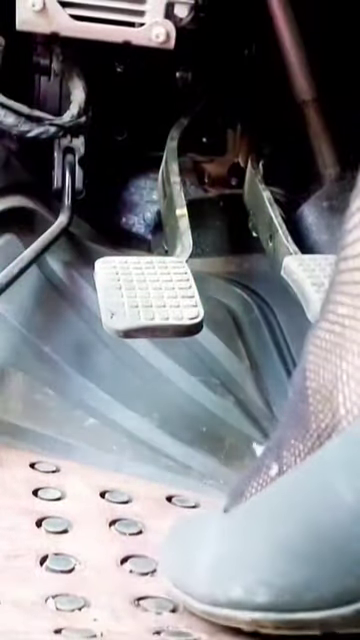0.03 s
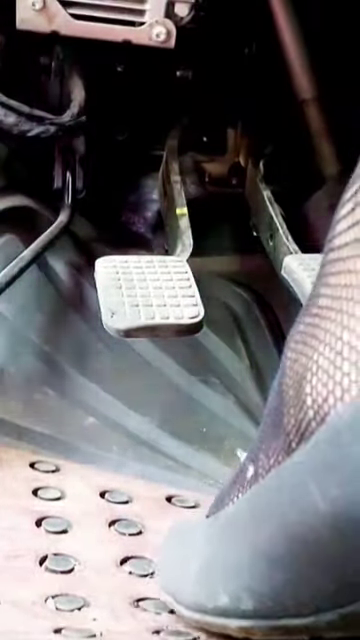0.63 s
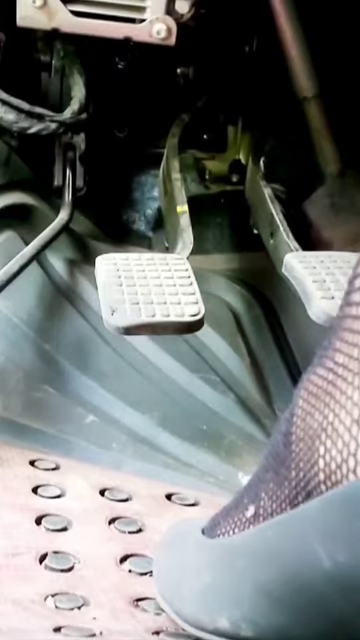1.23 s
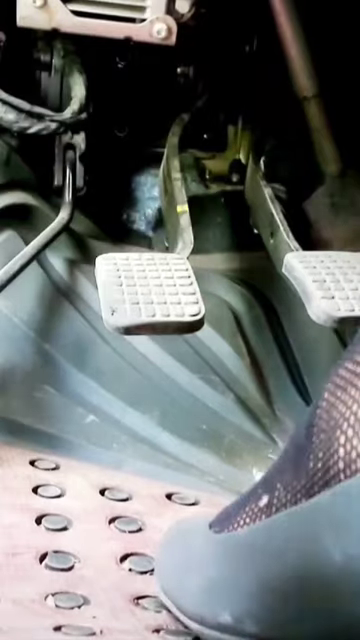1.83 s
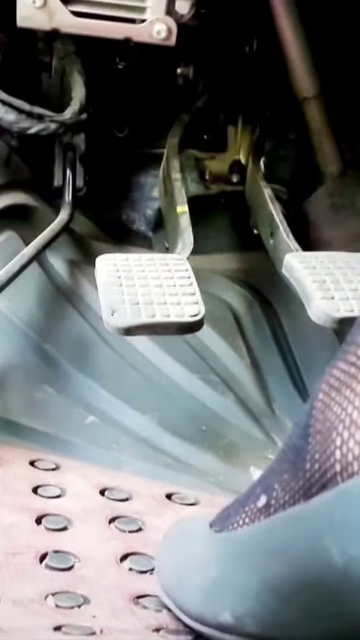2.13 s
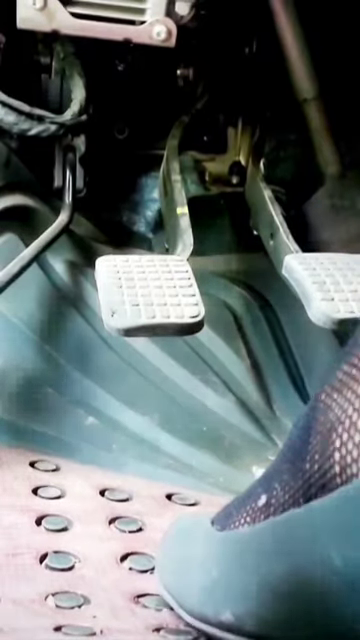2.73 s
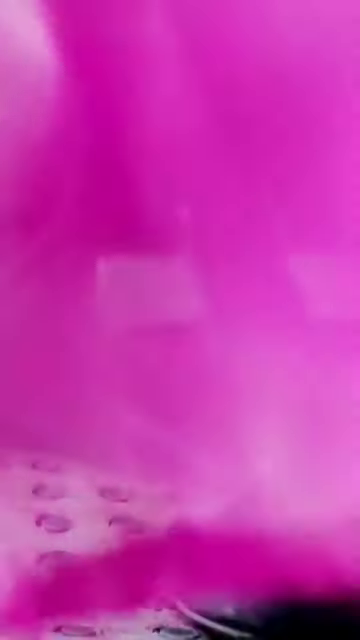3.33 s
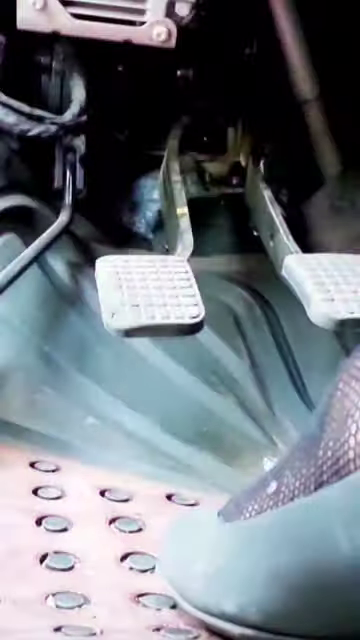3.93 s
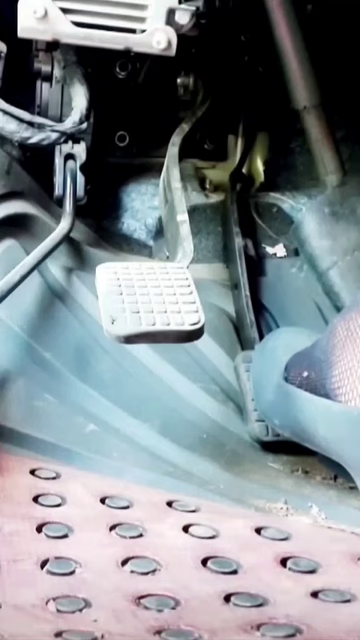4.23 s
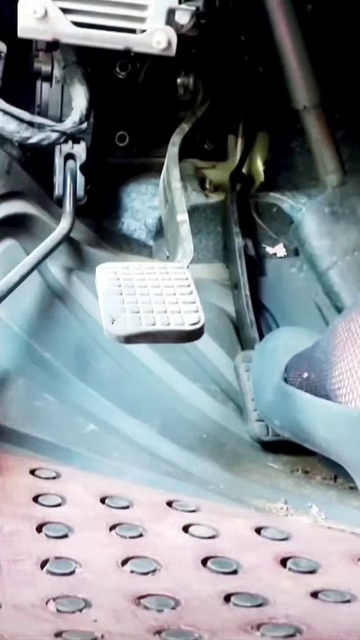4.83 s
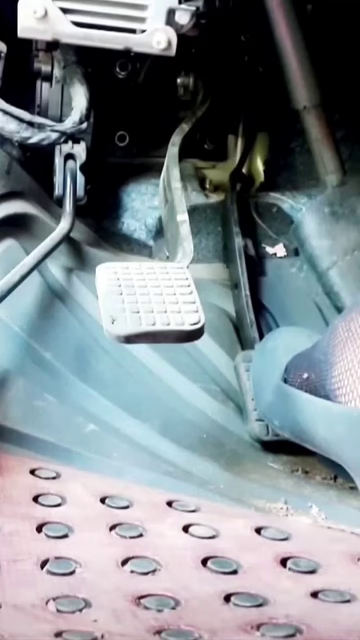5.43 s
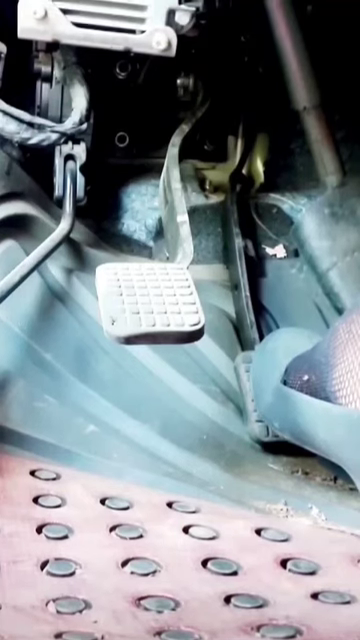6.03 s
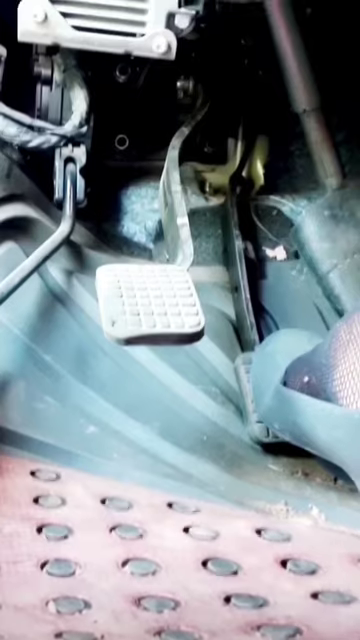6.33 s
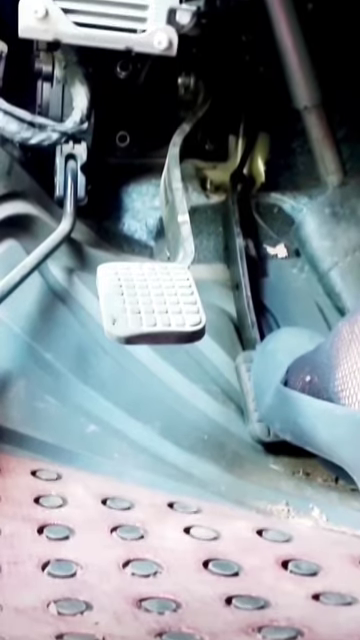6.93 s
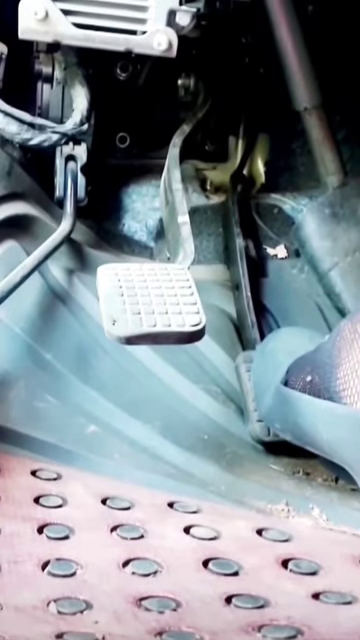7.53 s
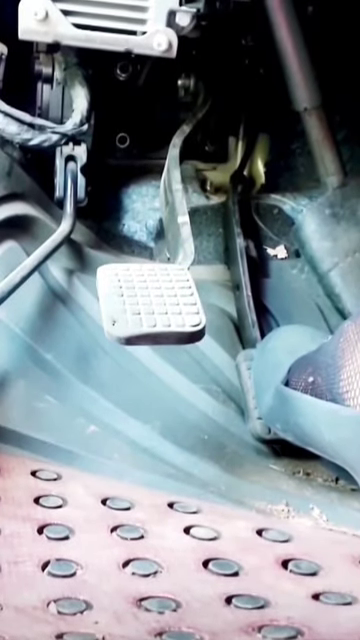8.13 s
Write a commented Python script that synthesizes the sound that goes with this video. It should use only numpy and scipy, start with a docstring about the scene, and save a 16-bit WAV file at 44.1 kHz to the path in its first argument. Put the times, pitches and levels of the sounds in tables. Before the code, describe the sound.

A shoe scuffs and thumps around the pedals inside a small car, with a short squeak and a few sharp clicks close to the microphone. After more clicks from the key and a soft electric whir, the starter cranks three times and the engine fires, thumping through the cabin before dropping to idle as the starter whines down. Very faint insects chirp outside.

```python
"""A small car starts, heard from the footwell: the starter's gears grind through three compression
strokes, the engine catches, and its firings thump the cabin and sink to a low idle as the freed
starter whines down. Beforehand a shoe shuffles and squeaks on the mat and knocks on the floor pan.
Pedals and key click, and an electric part whirs briefly. Insects chirp faintly outside."""
import sys
import numpy as np
from scipy import signal
from scipy.fft import rfft, irfft, next_fast_len
from scipy.io import wavfile

SR = 44100
rng = np.random.default_rng(int(sys.argv[2]) if len(sys.argv) > 2 else 0)


def pcm_store(signal):
    """Save signal as 16-bit PCM."""
    levels = np.round(np.clip(np.atleast_2d(signal), -1, 1) * 32767)
    wavfile.write(sys.argv[1], SR, levels.astype(np.int16).T)


N = 360738
TIME = np.arange(N) / SR

# Spectrum of the shaking floor. Each row: frequency in Hz, density in dB.
RUMBLE = [(28, -10), (45, 0), (80, 4), (100, 3.5), (140, -12)]


def from_db(db):
    return 10 ** (np.asarray(db) / 20)


def unit_rms(x):
    return x / np.sqrt(np.mean(x ** 2) + 1e-20)


def curves(rows):
    """Rows of (time in s, values ..) interpolated to one signal per value column."""
    times_s, *columns = np.transpose(rows)
    return [np.interp(TIME, times_s, column) for column in columns]


def gate(start_s, end_s, fade_s=0.01):
    """1 from start to end, with linear fades outside."""
    return np.clip((TIME - start_s) / fade_s + 1, 0, 1) * np.clip((end_s - TIME) / fade_s + 1, 0, 1)


def during(rows):
    return gate(rows[0][0], rows[-1][0])


def white():
    return rng.standard_normal(N)


def drift(rate_hz):
    """Straight lines between standard normal values, rate_hz of them a second."""
    knots = rng.standard_normal(20000)
    return np.interp(TIME * rate_hz, np.arange(len(knots)), knots)


def coloured(x, spectrum):
    """x shaped by (Hz, dB) points, falling 24 dB per octave beyond the ends; rms 1."""
    size = next_fast_len(N)
    octave = np.log2(np.maximum(np.arange(size // 2 + 1) * SR / size, 1))
    hz, db = np.transpose(spectrum)
    beyond = np.abs(octave - np.clip(octave, np.log2(hz[0]), np.log2(hz[-1])))
    gain = from_db(np.interp(octave, np.log2(hz), db) - 24 * beyond)
    return unit_rms(irfft(rfft(x, size) * gain, size)[:N])


def resonate(x, modes):
    """x through parallel resonances (Hz, width in Hz, dB) of alternating sign; rms 1."""
    out = 0
    for k, (hz, width_hz, db) in enumerate(modes):
        r = np.exp(-np.pi * width_hz / SR)
        band = signal.lfilter([1, 0, -1], [1, -2 * r * np.cos(2 * np.pi * hz / SR), r * r], x + 1e-18)
        out = out + (-1) ** k * from_db(db) * unit_rms(band)
    return unit_rms(out)


def ring(blows, hz, t60_s):
    """One mode: a unit blow starts a decaying sine of height 1."""
    r, w = from_db(-60 / (t60_s * SR)), 2 * np.pi * hz / SR
    return signal.lfilter([0, np.sin(w)], [1, -2 * r * np.cos(w), r * r], blows + 1e-18)


def lowpass(x, hz):
    return signal.sosfilt(signal.butter(2, hz, fs=SR, output="sos"), x)


def phase_of(hz):
    return 2 * np.pi * np.cumsum(hz) / SR


def add(out, start_s, sound):
    i = max(int(start_s * SR), 0)
    out[i:i + len(sound)] += sound[:max(N - i, 0)]


def swell(start_s, hold_s, db, attack_s, release_s):
    """Envelope that rises exponentially to its level at start_s, holds and decays."""
    age_s = TIME - start_s
    return from_db(db) * np.exp(np.minimum(age_s, 0) / attack_s
                                - np.maximum(age_s - hold_s, 0) / release_s)


def swells(rows, attack_s, release_s):
    """One envelope per level column of the events (start in s, hold in s, dB, ..)."""
    return [sum(swell(row[0], row[1], row[k], attack_s, release_s) for row in rows)
            for k in range(2, len(rows[0]))]


def tone(rows, jitter, flutter_db, rate_hz):
    """A sine along (s, Hz, dB) points, wavering in pitch and level."""
    hz, db = curves(rows)
    level = during(rows) * from_db(db + flutter_db * drift(rate_hz))
    return level * unit_rms(np.sin(phase_of(hz * (1 + jitter * drift(rate_hz)))))


def glides(rows, jitter, flutter_db, rate_hz, glide_s=0.0224):
    """Short wavering tones, each sliding from its first pitch towards a target."""
    out, waver = 0, 1 + jitter * drift(rate_hz)
    for start_s, hold_s, first_hz, target_hz, db in rows:
        hz = target_hz + (first_hz - target_hz) * np.exp(-np.maximum(TIME - start_s, 0) / glide_s)
        level = swell(start_s, hold_s, db, attack_s=0.0058, release_s=0.012)
        out = out + level * np.sin(phase_of(hz * waver))
    return np.sqrt(2) * out * from_db(flutter_db * drift(rate_hz))


def insects(trill_hz=7250, sweep_hz=450, pulse_hz=31, chorus_db=-85):
    """Trills of three rough falling pulses and thin, high chirps over a far chorus."""
    # Each row: start in seconds, level in dB.
    trill_events = [(0.46, -65), (0.99, -72.5), (1.53, -69.5), (3.055, -67), (3.62, -71.5), (4.2, -71),
                    (4.785, -71), (5.25, -77), (5.73, -74.5), (7.38, -67), (7.94, -70)]
    # Each row: start in seconds, length in seconds, level in dB.
    chirp_events = [(0.416, 0.12, -57.5), (0.737, 0.062, -55.5), (3.499, 0.032, -63.5), (7.777, .05, -60.5),
                    (7.903, 0.046, -64.5), (8.088, 0.037, -61)]
    trills, chirp_level = np.zeros(N), np.zeros(N)
    pulse = (np.arange(int(3 * SR / pulse_hz)) * pulse_hz / SR) % 1
    for start_s, db in trill_events:
        hz = trill_hz + sweep_hz * (0.5 - pulse) + 220 * drift(1500)[:len(pulse)]
        add(trills, start_s, from_db(db) * 2 * np.sin(np.pi * pulse) * np.sin(phase_of(hz)))
    for start_s, length_s, db in chirp_events:
        add(chirp_level, start_s, from_db(db) * signal.windows.tukey(int(length_s * SR)))
    chorus = from_db(chorus_db + 4 * drift(30)) * resonate(white(), [(trill_hz, 250, 0)])
    return trills + chorus + chirp_level * resonate(white(), [(8500, 70, 0), (13750, 200, -2)])


def footwell(x, t60_s=0.06, wet_db=-10.5):
    """Adds dense, dull, short reflections from trim and panels."""
    age_s = np.arange(SR // 4) / SR
    tail = signal.lfilter(*signal.butter(1, [500, 6000], "band", fs=SR), rng.standard_normal(len(age_s)))
    tail *= from_db(-60 * age_s / t60_s)
    return x + from_db(wet_db) * signal.fftconvolve(x, tail / np.sqrt(np.sum(tail ** 2)))[:N]


def shuffling_feet(grain_db=2.5, restless_db=3.0):
    """Shoves sway the floor and boom in the cabin; rubbing fibres add a grainy scuff and a hiss."""
    # Foot against floor. Each row: start and hold in seconds, sway and boom in dB.
    shoves = [(0.01, 0.092, -46, -40.5), (0.345, 0.044, -35.5, -34.5), (0.46, 0.043, -52, -46),
              (0.68, 0.11, -29.5, -29), (0.865, 0.058, -42.5, -40.5), (1.12, 0.044, -40.5, -42),
              (1.34, 0.031, -51, -38.5), (1.455, 0.016, -33, -43), (1.65, 0.093, -39, -43),
              (1.8, 0.04, -34.5, -35), (1.96, 0.016, -36.5, -45), (2.065, 0.023, -45, -36),
              (2.26, 0.063, -34, -33.5), (2.49, 0.025, -40, -36.5), (2.74, 0.093, -45, -50),
              (3.68, 0.25, -49.5, -51), (4.035, 0.13, -34.5, -38.5), (4.255, 0.044, -38, -40),
              (4.69, 0.086, -64, -49), (5.405, 0.045, -51, -49), (5.79, 0.071, -62, -38.5)]
    # Sole over mat. Each row: start and hold in seconds, scuff and hiss in dB.
    rubs = [(0.0, 0.053, -42, -49.5), (0.58, 0.23, -51.5, -60), (1.18, 0.044, -58.5, -69),
            (1.33, 0.018, -55, -65), (1.77, 0.13, -48.5, -58.5), (2.29, .02, -71, -61),
            (2.9, 0.019, -65.5, -67), (3.08, 0.036, -84.5, -67.5), (3.5, 0.022, -71.5, -64.5),
            (3.82, 0.05, -69, -65), (4.14, 0.055, -69, -62.5), (4.335, .02, -63.5, -69)]
    # Restless legs and clothing. Each row: time in seconds, rumble, scuff and hiss in dB.
    fidget = [(0, -46.5, -53, -62.5), (1.05, -54.5, -63, -64.5), (1.6, -52.5, -55.5, -68),
              (2.1, -48, -69.5, -63), (2.85, -51, -70, -66), (3.2, -60.5, -80, -66), (4.3, -58, -75, -68.5),
              (4.5, -69, -75.5, -79), (5.1, -62, -75, -74.5), (5.7, -60.5, -73, -81),
              (6.1, -47, -66.5, -77.5)]
    # Three noise spectra. Each row: frequency in Hz, density in dB.
    cabin_spectrum = [(90, 0.5), (115, 4), (150, -2.5), (190, -8), (290, -14), (450, -27.5), (900, -59)]
    scuff_spectrum = [(300, 4), (600, -2.5), (1100, -4), (2000, -13), (4000, -19.5), (9000, -29.5)]
    hiss_spectrum = [(600, -6), (2000, 1), (3300, -1.5), (5000, -0.5), (7700, 0.5), (10000, 0.5),
                     (15000, -0.5)]
    sway, boom = swells(shoves, attack_s=0.011, release_s=0.025)
    scuff, hiss = swells(rubs, attack_s=0.052, release_s=0.055)
    rumble_db, scuff_db, hiss_db = curves(fidget)
    rumble_db += restless_db * drift(14)
    floor = np.hypot(sway, from_db(rumble_db - 4)) * coloured(white(), RUMBLE)
    cabin = np.hypot(boom, from_db(rumble_db)) * coloured(white(), cabin_spectrum)
    grains = white() * from_db(grain_db * drift(250))
    sole = np.hypot(scuff, from_db(scuff_db)) * coloured(grains, scuff_spectrum)
    fibres = np.hypot(hiss, from_db(hiss_db)) * coloured(white(), hiss_spectrum)
    return floor + cabin + sole + fibres


def sole_drags(relative_width=0.53):
    """Each drag is a swelling rasp in one resonance of the mat."""
    # Each row: start and length in seconds, centre in Hz, level in dB.
    drags = [(0.852, 0.063, 1270, -52), (1.923, 0.043, 686, -47.5), (4.856, 0.066, 585, -62),
             (5.068, 0.03, 890, -63), (5.31, 0.033, 710, -60.5), (5.348, 0.065, 640, -57.5),
             (5.617, 0.076, 796, -63), (5.76, 0.046, 750, -64), (5.793, 0.15, 253, -45.5)]
    out = np.zeros(N)
    for start_s, length_s, hz, db in drags:
        stroke = np.hanning(int(length_s * SR))
        mat = [(hz, relative_width * hz, 0)]
        rasp = resonate(resonate(rng.standard_normal(len(stroke)), mat), mat)
        add(out, start_s, from_db(db) * stroke * rasp)
    return out


def sole_squeak(jitter=0.0446, db_per_harmonic=-6.0):
    """The sole sticks and slips on the mat, quickening as it slides."""
    # Each row: time in seconds, pitch in Hz, level in dB.
    slide = [(1.16, 297.6, -70), (1.18, 367, -48), (1.2, 449, -40.5), (1.22, 533, -53), (1.245, 547, -47),
             (1.27, 576, -50), (1.288, 563, -75)]
    hz, db = curves(slide)
    phase = phase_of(hz * (1 + jitter * drift(400)))
    harmonics = sum(from_db(db_per_harmonic * k) * np.sin((k + 1) * phase) for k in range(5))
    return during(slide) * from_db(db) * unit_rms(harmonics)


def heel_knocks(highpass_hz=80, rattle_db=-30.0, rattle_s=0.012):
    """A soft heel's rounded push rings the floor pan; loose trim rattles briefly."""
    # Each row: start in seconds, level in dB, contact cut-off in Hz, sign of the push.
    knocks = [(0.3396, -6, 1464, -1), (1.2854, -14.5, 690, 1), (1.7902, -13.5, 650, 1),
              (1.822, -23, 200, 1)]
    # Each row: frequency in Hz, gain in dB, t60 in seconds.
    pan_modes = [(129.7, -11, 0.15), (263, 0, 0.072), (425, -8, 0.066), (642, -15.5, 0.032),
                 (846, -19, 0.036), (1094, -17.5, 0.021), (1615, -29, .04), (2177, -23, 0.033),
                 (2840, -21, 0.043), (3870, -22, .025)]
    push, shaken = np.zeros(N), np.zeros(N)
    for start_s, db, cutoff_hz, sign in knocks:
        contact = signal.lfilter(*signal.butter(2, cutoff_hz, fs=SR), signal.unit_impulse(SR // 20))
        add(push, start_s, sign * from_db(db) * contact)
        shaken += swell(start_s, 0, db + rattle_db, rattle_s, rattle_s) * (TIME > start_s)
    pan = sum((-1) ** k * from_db(db) * ring(push, hz, t60_s)
              for k, (hz, db, t60_s) in enumerate(pan_modes))
    rattle = shaken * coloured(white(), [(700, 0.5), (1200, -2.5), (2600, -11.5)])
    return signal.lfilter(*signal.butter(1, highpass_hz, "high", fs=SR), pan) + rattle


def clicks(body_gain_db=-3.0, thud_t60_s=0.07, rise_s=0.0017):
    """Pedals, key and starter drive: each contact is a bright snap, a dull thud and a linkage ring."""
    # Each row: start in seconds, snap and body in dB, snap t60 in seconds.
    contacts = [(0.356, -33.5, -34, 0.03), (2.0618, -26, -33, 0.033), (2.108, -55, -44.5, 0.064),
                (2.5167, -40, -48, 0.025), (3.805, -47, -74, 0.017), (4.356, -50.5, -54, .07),
                (4.426, -57, -69, 0.051), (4.444, -58, -61.5, 0.04), (4.479, -61, -69, 0.038),
                (4.665, -46, -49, 0.19), (4.6878, -26, -26.5, 0.032), (4.892, -62, -64, .06),
                (5.002, -59, -66, 0.035), (5.082, -58, -52, 0.044), (5.219, -59, -69.5, 0.077),
                (5.34, -63.5, -67, 0.39), (5.394, -44, -50, 0.042), (5.405, -39, -37, 0.042),
                (5.527, -59, -68, 0.046), (5.5848, -40.5, -59, 0.054), (5.8494, -40, -38.5, 0.054),
                (6.811, -33, -34.5, 0.057), (8.07, -50, -60.5, 0.041)]
    # Each row: frequency in Hz, density in dB.
    snap_spectrum = [(700, -8.5), (1500, -4), (2600, 0.5), (4000, -1), (7000, -2), (11000, -2), (15000, -6)]
    # Each row: frequency in Hz, gain in dB, t60 in seconds.
    linkage_modes = [(315, -6.5, 0.13), (440, -2.5, .13), (510, -1, 0.098), (607, -3, 0.052),
                     (872, -4, .06), (1380, -11, 0.032), (2450, -5, 0.039), (2826, -10, 0.039),
                     (5320, -13, 0.036)]
    snap, thud = np.zeros(N), np.zeros(N)
    age_s = np.arange(SR // 4) / SR
    rise = 1 - np.exp(-age_s / rise_s)
    for start_s, snap_db, body_db, t60_s in contacts:
        add(snap, start_s, from_db(snap_db - 60 * age_s / t60_s) * rise)
        add(thud, start_s, from_db(body_db + body_gain_db - 60 * age_s / thud_t60_s) * rise)
    out = snap * coloured(white() * from_db(1.2 * drift(900)), snap_spectrum)
    out += thud * coloured(white(), [(250, -2.5), (450, -7.5), (900, 0.0), (2000, -9.0)])
    starts_s, _, bodies_db, _ = np.transpose(contacts)
    scatter_db = 1.5 * rng.standard_normal((len(contacts), len(linkage_modes)))
    for k, (hz, db, t60_s) in enumerate(linkage_modes):
        blows = np.zeros(N)
        blows[(starts_s * SR).astype(int)] = from_db(bodies_db + body_gain_db + db + scatter_db[:, k])
        out += (-1) ** k * ring(blows, hz, t60_s)
    return out


def ignition_whir():
    """After the key turns, a small electric part runs briefly; a soft hum follows until cranking."""
    # Each row: time in seconds, level in dB.
    whir_levels = [(5.18, -86), (5.24, -75), (5.38, -73), (5.43, -61), (5.53, -54.5), (5.6, -68.5),
                   (5.75, -87)]
    # Each row: frequency and width in Hz, gain in dB.
    whir_lines = [(390, 16, 0.5), (790, 20, -14), (3120, 20, -15), (3460, 25, -14)]
    # Each row: time in seconds, pitch in Hz, level in dB.
    hum_curve = [(5.85, 480, -69), (5.9, 470, -63.5), (6.12, 474, -60)]
    db, = curves(whir_levels)
    hum = tone(hum_curve, jitter=0.035, flutter_db=2.5, rate_hz=60)
    return during(whir_levels) * from_db(db) * resonate(white(), whir_lines) + hum


def belt_hum(firings, full_at_s=7.6, flutter_db=3.0):
    """A belt-driven part hums at multiples of the firing rate as the idle settles."""
    # Each row: cycles per firing, level in dB.
    orders = [(13, -52), (26, -59), (39, -64)]
    hum = sum(from_db(db + flutter_db * drift(28)) * unit_rms(np.sin(2 * np.pi * order * firings))
              for order, db in orders)
    return gate(full_at_s, 9, fade_s=0.22) * hum


def cabin_drone():
    """A low, wavering tone fills the cabin as the engine catches, then fades."""
    # Each row: time in seconds, pitch in Hz, level in dB.
    drone = [(6.62, 100.2, -48), (6.65, 101.4, -32), (6.87, 106.2, -38.5), (7.0, 112.7, -31),
             (7.1, 113.3, -42.5), (7.62, 111, -40), (7.8, 108.9, -58), (8.18, 111, -65)]
    return tone(drone, jitter=0.0207, flutter_db=6.5, rate_hz=40)


def panels(blows, t60_s=0.23, rise_s=0.008):
    """Blows ring a dense cluster of panel modes, the same way each time."""
    age_s = np.arange(SR // 4) / SR
    envelope = from_db(-60 * age_s / t60_s) * (1 - np.exp(-age_s / rise_s))
    return signal.fftconvolve(blows, envelope * rng.standard_normal(len(age_s)))[:N]


def engine(catch_s=6.635, uneven_db=3.0, chug_depth=0.27):
    """Each firing thumps the cabin and rings the bulkhead; intake and valve gear swell with it."""
    # Each row: time in seconds, firings per second.
    speed = [(6.6, 35.1), (6.8, 44.7), (6.95, 47.3), (7.05, 39.1), (7.2, 38), (7.35, 28.4), (7.6, 26.5),
             (7.85, 25.4), (8.18, 22.8)]
    # Flare and settling. Each row: time in seconds, boom, block and clatter in dB.
    levels = [(6.63, -29.5, -41.5, -51.5), (6.69, -26.5, -38, -49.5), (6.97, -31, -42, -53.5),
              (7.15, -38.5, -42.5, -53), (7.7, -44.5, -42, -57.5), (8.0, -49, -44.5, -61),
              (8.18, -44, -41.5, -62.5)]
    # Strength of each cylinder in firing order.
    cylinders_db = [0.17, -1.4, 0.27, 0.46]
    # Each row: frequency and width in Hz, gain in dB.
    cabin_modes = [(46.6, 4.6, -6.5), (79, 32, -8.5), (112.3, 14, 2), (152, 28, -12.5)]
    # Bulkhead and valve gear. Each row: frequency in Hz, density in dB.
    block_spectrum = [(88, -43), (150, 2), (200, -2), (312, -2.5), (433, -9.5), (469, -7.5), (538, -17.5),
                      (669, -11), (754, -17), (985, -15.5), (1120, -22), (1370, -22.5), (1600, -31.5),
                      (2080, -33), (3520, -120)]
    clatter_spectrum = [(900, 3), (1300, -3), (1600, -8), (2200, -0.5), (3100, -12.5), (4200, -10),
                        (6000, -15.5), (7700, -12.5), (11000, -16.5), (15000, -18.5)]
    firing_hz, = curves(speed)
    boom_db, block_db, clatter_db = curves(levels)
    firings = np.cumsum(firing_hz * (1 + 0.006 * drift(20))) / SR
    index = firings.astype(int)
    scatter_db = uneven_db * rng.standard_normal(1000)[index]
    strength = from_db(np.take(cylinders_db, index, mode="wrap") + scatter_db)
    thumps = np.diff(index, prepend=0) * strength / np.sqrt(firing_hz)
    chug = 1 + chug_depth * strength * np.sin(np.pi * firings) ** 2
    boom = unit_rms(lowpass(resonate(thumps, cabin_modes), hz=260))
    shake = coloured(chug * white(), RUMBLE)
    bulkhead = from_db(block_db - 1) * coloured(panels(thumps), block_spectrum)
    intake = from_db(block_db - 5) * coloured(chug * white(), block_spectrum)
    valves = from_db(clatter_db) * coloured(chug * white(), clatter_spectrum)
    running = from_db(boom_db - 5) * (boom + shake) + bulkhead + intake + valves
    return gate(catch_s, 9, fade_s=0.025) * running + belt_hum(firings)


def starter_coast(rasp_hz=112.5, flutter_db=2.5, gain_db=-1.5):
    """The freed starter coasts with a falling, unsteady whine that swells at each resonance."""
    # Each row: time in seconds, whine in Hz.
    whine_curve = [(6.95, 5800), (7.29, 4150), (7.64, 2360), (7.85, 1744)]
    # Each row: frequency and width in Hz, gain in dB.
    resonances = [(5450, 260, -66), (4140, 290, -59), (3500, 250, -69), (2340, 317, -56)]
    hz, = curves(whine_curve)
    power = sum(from_db(db) ** 2 / (1 + (2 * (hz - centre_hz) / width_hz) ** 2)
                for centre_hz, width_hz, db in resonances)
    whine = unit_rms(lowpass(white(), rasp_hz) * np.sin(phase_of(hz)))
    return during(whine_curve) * np.sqrt(power) * from_db(gain_db + flutter_db * drift(45)) * whine


def gear_load(drag_db=-49, throw_out_s=6.725):
    """Tooth force: steady drag, clash and piston rebound per stroke, a rasp as the pinion leaves."""
    # Compression strokes. Each row: start in seconds, clash in dB, delay in seconds, rebound in dB.
    strokes = [(6.133, -34, 0.11, -41), (6.33, -40.5, 0.079, -36), (6.547, -34.5, 0.067, -54)]
    load = from_db(drag_db) * during(strokes)
    load += swell(throw_out_s, 0, db=-36, attack_s=0.028, release_s=0.028)
    for start_s, clash_db, delay_s, rebound_db in strokes:
        clash = swell(start_s, 0.016, clash_db, attack_s=0.0046, release_s=0.023)
        rebound = swell(start_s + delay_s, 0, rebound_db, attack_s=0.045, release_s=0.04)
        rebound *= TIME > start_s
        load = np.sqrt(load ** 2 + clash ** 2 + rebound ** 2)
    return load


def starter(mesh_hz=181.5, ripple_db=-1.0, clash_db=2.0, chatter_db=1.3):
    """Teeth clash and rattle the housing, chopping the motor's groan and the ring gear's singing."""
    # Each row: frequency in Hz, density in dB.
    grind_spectrum = [(40, 4), (90, 10.5), (200, 9), (400, 11), (700, 5), (1000, -1), (1600, -6),
                      (2300, -2), (3100, -10.5), (4300, -9.5), (6000, -14), (7800, -8), (11000, -15),
                      (15000, -19)]
    # Each row: frequency and width in Hz, gain in dB.
    housing_modes = [(673, 50, 3), (975, 80, 1.5), (1213, 33, -6.5), (1339, 21, -3), (1686, 44, -12),
                     (1970, 34, -6.5), (2180, 23, -10), (2570, 13, -12.5), (3470, 24, -16),
                     (4150, 44, -15.5)]
    # Tones under load. Each row: start and hold in seconds, first and target pitch in Hz, level in dB.
    motor_groans = [(6.137, 0.051, 439.7, 214, -32), (6.218, 0.021, 263, 290, -34),
                    (6.255, 0.06, 230, 212, -42), (6.329, 0.008, 429, 445, -29.5),
                    (6.365, 0.014, 439, 422, -36), (6.407, 0.02, 442.3, 385, -22.5),
                    (6.548, 0.042, 468.3, 165, -33.5)]
    gear_rings = [(6.144, 0.033, 992, 834, -37), (6.222, 0.049, 856, 884, -32),
                  (6.36, 0.053, 960, 965, -40.5), (6.415, 0.035, 854, 886, -36.5),
                  (6.563, 0.022, 875, 856, -37)]
    mesh = np.sin(phase_of(mesh_hz * (1 + 0.08 * drift(25))))
    teeth = from_db(ripple_db * mesh + clash_db * drift(700))
    grind = coloured(teeth * white(), grind_spectrum)
    housing = resonate(teeth * white(), housing_modes) * gate(6.1, 6.6, fade_s=0.046)
    groan = glides(motor_groans, jitter=0.029, flutter_db=1.6, rate_hz=300)
    sing = glides(gear_rings, jitter=0.00696, flutter_db=1.5, rate_hz=250)
    return gear_load() * (grind + housing) + from_db(chatter_db * mesh) * (groan + sing)


def scene():
    """Mono mix; knocks, clicks, squeak and drags get the footwell's reflections."""
    near = footwell(heel_knocks() + clicks() + sole_squeak() + sole_drags()) + shuffling_feet()
    car = ignition_whir() + starter() + engine() + cabin_drone() + starter_coast()
    return (near + car + insects())[None]


def record(dry, cutoff_hz=15800):
    """A steep low-pass cuts the top."""
    return signal.sosfilt(signal.ellip(10, 0.2, 80, cutoff_hz, fs=SR, output="sos"), dry)


dry = scene()
out = record(dry)
pcm_store(out)
```